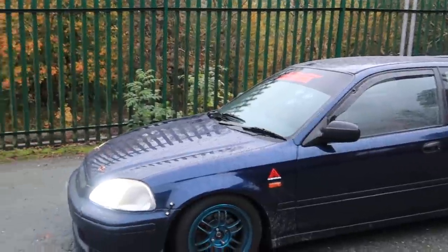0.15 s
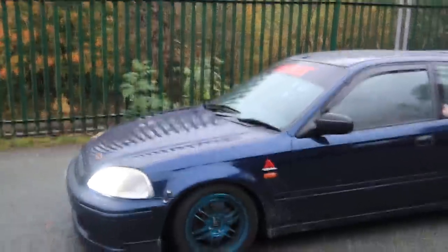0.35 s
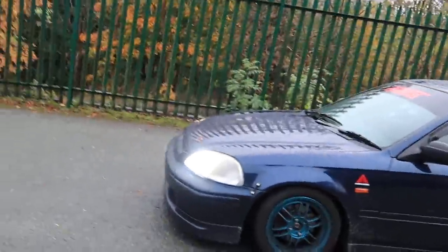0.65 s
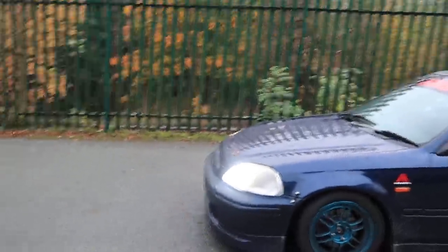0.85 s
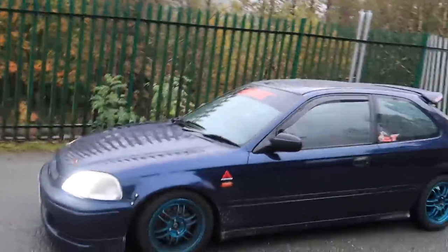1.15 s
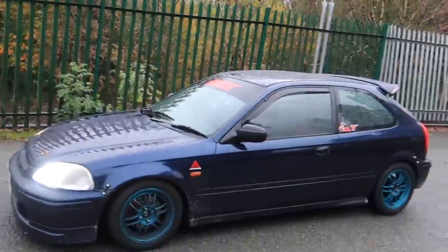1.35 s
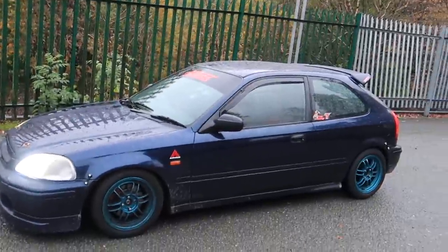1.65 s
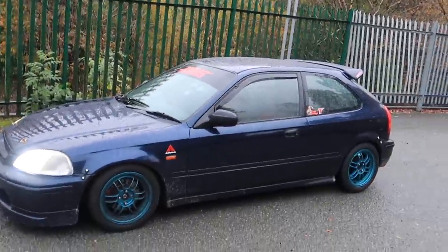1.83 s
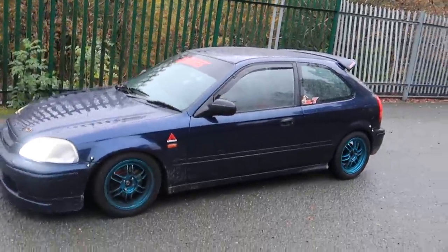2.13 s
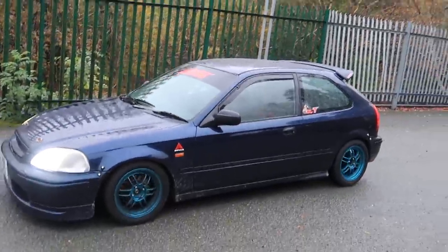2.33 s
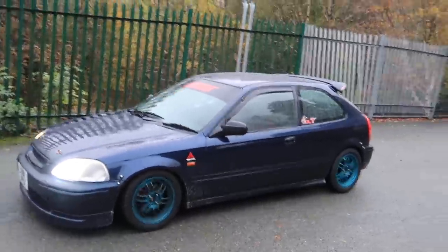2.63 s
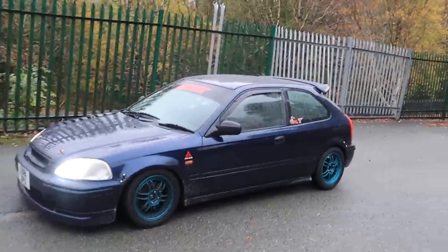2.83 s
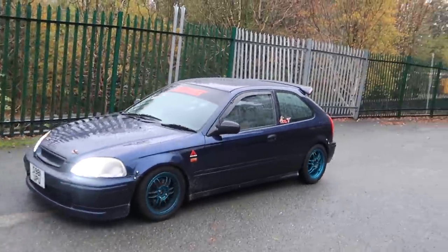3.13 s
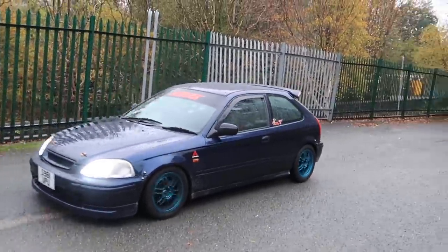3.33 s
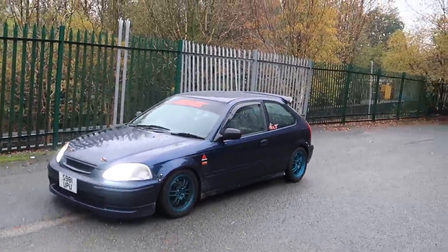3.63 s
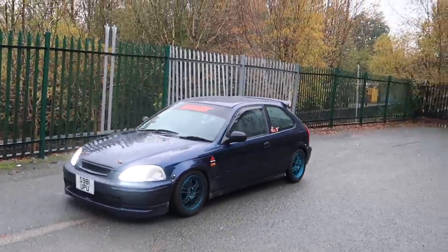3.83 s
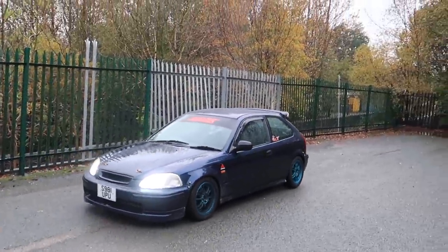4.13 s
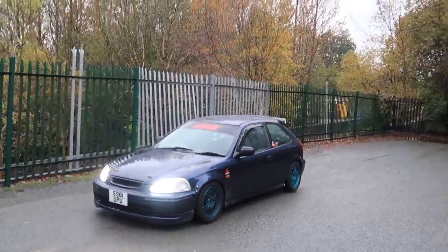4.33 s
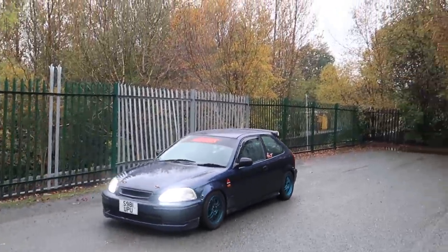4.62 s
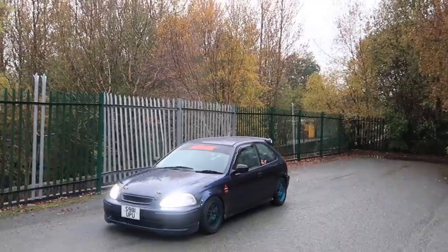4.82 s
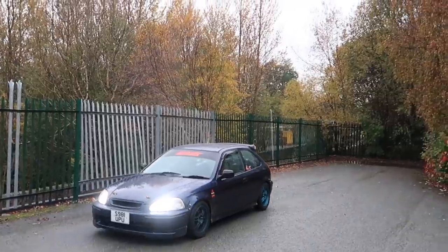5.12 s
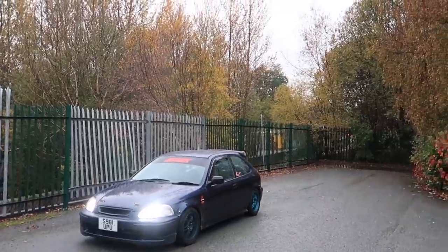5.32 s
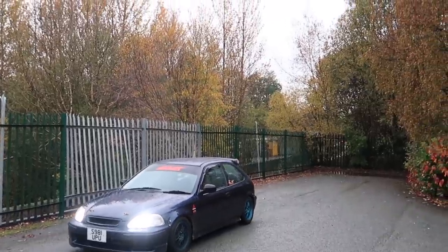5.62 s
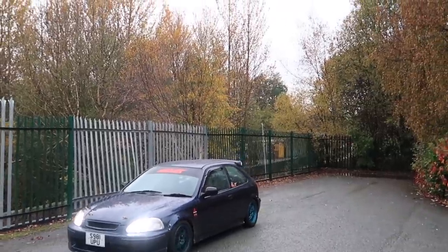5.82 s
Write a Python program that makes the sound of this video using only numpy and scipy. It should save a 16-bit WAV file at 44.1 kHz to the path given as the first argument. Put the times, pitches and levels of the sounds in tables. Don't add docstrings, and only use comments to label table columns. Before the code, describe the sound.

Boomy uneven car idle close by, a metallic clank, throttle blips with burbling lift-offs, then a fast climb to a loud buzzing exhaust howl.

```python
import sys
import numpy as np
from scipy import signal
from scipy.io import wavfile
from scipy.ndimage import uniform_filter1d

SR = 44100
rng = np.random.default_rng(int(sys.argv[2]) if len(sys.argv) > 2 else 0)


def inscribe(sig):
    pcm = np.round(np.clip(np.atleast_2d(sig).T, -1, 1) * 32767)
    wavfile.write(sys.argv[1], SR, pcm.astype(np.int16))


def volts(x):
    e = np.asarray(x, float) / 20
    return 10 ** e


N = 263277
RUN_IN = 4096


def rms_one(x):
    return x / np.sqrt(np.mean(x ** 2) + 1e-20)


def in_time(rows):
    s, *columns = np.transpose(rows)
    return [np.interp(np.arange(N) / SR, s, c) for c in columns]


def at_hz(points, hz):
    point_hz, value = np.transpose(points)
    return np.interp(np.log(hz), np.log(point_hz), value)


def band(x, low_hz, high_hz, order=2):
    edges_hz = [low_hz, min(high_hz, .45 * SR)]
    return signal.sosfilt(signal.butter(order, edges_hz, "band", fs=SR, output="sos"), x)


def resonance(x, hz, width_hz):
    r = np.exp(-np.pi * width_hz / SR)
    zeros = np.array([1, 0, -1]) * (1 - r * r) / 2
    poles = [1, -2 * r * np.cos(2 * np.pi * hz / SR), r * r]
    return signal.lfilter(zeros, poles, x + 1e-18)


def drift(rate_hz):
    knots = rng.standard_normal(400)
    return np.interp(np.arange(N) / SR * rate_hz * 2, np.arange(400), knots)


def dull(x):
    knee_hz, top_db = 3940, -20
    low = signal.sosfilt(signal.butter(6, knee_hz, fs=SR, output="sos"), x)
    return low + volts(top_db) * band(x, knee_hz, 9900)


def place(out, body, s, peak_db):
    at = round(s * SR)
    out[at:at + len(body)] += volts(peak_db) * body / np.abs(body).max()


def echo(x):
    # time in seconds, lag in ms, gain.
    bounce = [(0, .98, .08), (1.8, .98, .12), (2.4, 1.0, .33), (3.1, .97, .36), (3.6, .99, .28),
              (4.2, .95, .22), (4.9, .97, .45), (5.97, .95, .5)]
    at = np.arange(N)
    lag_ms, gain = in_time(bounce)
    return x + gain * np.interp(at - lag_ms * SR / 1000, at, x, left=0)


def clatter(turns, patchy_db=1.1, throb=0.08):
    # time in seconds, level in dB.
    level = [(0.0, -39.5), (0.21, -40.5), (0.33, -37.5), (0.444, -38), (0.65, -39), (0.95, -37),
             (1.25, -39), (1.45, -37), (1.62, -44.5), (2.17, -41.5), (2.5, -42.5), (3.05, -40), (3.5, -42),
             (3.95, -39), (4.12, -38.5), (4.25, -39.5), (4.42, -38), (4.53, -37.5), (4.57, -42.5),
             (4.7, -40.5), (5.05, -35.5), (5.278, -29.5), (5.522, -32.5), (5.764, -31), (5.97, -24)]
    # frequency in Hz, density in dB per Hz.
    colour = [(280, 6), (420, -4.5), (600, -7), (800, -8), (1150, -8), (1700, -12), (2100, -15.5),
              (3200, -20), (4300, -25), (5500, -32), (8000, -39), (11000, -41.5), (13000, -55.5),
              (15000, -81.5)]
    # frequency in Hz, side minus mid in dB.
    width = [(300, -30), (1000, -31), (2200, -20), (4000, -7.5), (6000, 1), (9000, 3.5), (13000, 6)]
    # time in seconds, extra treble in dB.
    rolling = [(1.5, 0.5), (1.7, -2), (2.6, -0.5), (3.2, 0), (3.85, -0.5), (4.1, 3.5), (4.25, -0.5),
               (4.4, 3.5), (4.53, 1.5), (4.6, 0.5), (5.3, 3), (5.97, 0.6)]
    # centre in Hz, width in Hz, share (negative cuts).
    humps = [(1440, 300, 0.56), (1747, 190, -0.6), (995, 160, -0.4)]
    mid_db, = in_time(level)
    treble_db = -52.5 + 0.8 * (mid_db + 40) + in_time(rolling)[0]
    white = rng.standard_normal((2, 2, N))
    white[:, 0] = [echo(w) for w in white[:, 0]]
    white[:, 0] += sum(share * resonance(white[:, 0], hz, width_hz) for hz, width_hz, share in humps)
    white[:, 0] *= 1 + throb * np.cos(2 * np.pi * turns)
    edges_hz = 270 * 2 ** np.arange(0, 6.1, .4)
    together = drift(6)
    parts = np.zeros((2, 2, N))
    for k, (low_hz, high_hz) in enumerate(zip(edges_hz, edges_hz[1:])):
        hz = np.sqrt(low_hz * high_hz)
        band_db = at_hz(colour, hz) + patchy_db * (together + drift(23))
        mid, side = band(white[k % 2], low_hz, high_hz) * volts(band_db)
        side = side * volts(at_hz(width, hz))
        parts[int(hz > 2500)] += [mid + side, mid - side]
    return volts(mid_db) * rms_one(parts[0]) + volts(treble_db) * rms_one(parts[1])


def rattles(clicks_per_s=7300.0):
    # start in seconds, peak in dB, centre in Hz, length in seconds.
    bursts = [(0.247, -49, 3800, 0.014), (0.255, -39.5, 4400, 0.032), (0.321, -36, 1150, 0.019),
              (0.471, -35.5, 4030, 0.045), (2.042, -35.5, 6980, 0.01), (3.708, -34.5, 6760, 0.036),
              (4.472, -36, 7350, 0.068), (1.119, -32.5, 4600, 0.054), (3.704, -35, 2200, 0.023),
              (3.705, -31.5, 3830, 0.015), (3.223, -39, 2000, .08), (4.45, -40, 3560, 0.061)]
    out, t = np.zeros(N), np.arange(6000) / SR
    for s, db, hz, length_s in bursts:
        draw = rng.random((2, len(t)))
        clicks = (draw[0] < clicks_per_s / SR) * (draw[1] - .5)
        clicks *= np.exp(-(t / length_s) ** 3) + .3 * np.exp(-t / .028)
        body = resonance(clicks, hz, 0.87 * hz)
        body += .5 * resonance(clicks, 1300, 280) + 0.1 * resonance(clicks, 2700, 300)
        body += .3 * resonance(clicks, 3600, 1000)
        place(out, dull(band(body, 750, 12000)), s, db)
    return out


def snaps():
    # start in seconds, peak in dB, ring in Hz, t60 in
    # seconds, crack share.
    sharp_clicks = [(.352, -31, 514, 0.014, .02), (0.369, -26.5, 680, 0.01, 0.12), (.461, -24, 940, 0.0094, 0.31),
                    (1.026, -11, 570, 0.0036, 0.93), (2.035, -34, 3000, 0.01, .2),
                    (2.0446, -11.5, 1150, 0.0093, 0.5), (2.066, -28, 1390, 0.0063, .1),
                    (2.083, -29.5, 810, 0.036, .03), (2.12, -31, 1254, .015, 0.046), (4.632, -25, 900, 0.0057, 0.4),
                    (4.647, -26, 820, .008, .3), (4.662, -26, 1200, .006, .4), (4.717, -21, 900, 0.0055, 0.4)]
    tail_per_s = 21.0
    out, t = np.zeros(N), np.arange(5000) / SR
    for s, db, hz, t60_s, crack in sharp_clicks:
        click = 1. * (t == 0)
        tail = rng.standard_normal(len(t)) * (t > .006) * np.exp(-t / .021)
        tail *= tail_per_s * t60_s * .2
        body = resonance(resonance(click + tail, hz, 2.0 / t60_s), hz, 1200)
        edge = resonance(click + 0.19 * tail, 1600, 2000)
        place(out, dull(body / np.abs(body).max() + crack * edge / edge.max()), s, db)
    return out


def clanks(clicks_per_s=5000.0, tail=.3, tail_s=.028):
    # start in seconds, peak in dB, length in seconds, brightness in dB per octave.
    knocks = [
        (.7535, -19.5, .012, 1.5),
        (.8025, -31, .005, 5.0),
        (.769, -30, .018, 3.0),
        (.8078, -13, .012, .6),
        (.817, -12, .011, 1.2),
        (.827, -13.5, .012, 1.5),
        (.841, -24, .022, 3.0),
    ]
    # frequency in Hz, level in dB, t60 in seconds.
    linkage = [(840, -9, .045), (1125, 0, .045), (1300, -7, .02), (1448, -4, .035), (1750, -10, .015),
               (2089, -7, .03), (2584, -11, .022), (2955, -11, .015), (3499, -10, .015), (3774, -10, .022),
               (4400, -12, .012), (4651, -15, .02), (6500, -12, .005)]
    out, t = np.zeros(N), np.arange(8000) / SR
    for s, db, length_s, tilt_db in knocks:
        draw = rng.random((2, len(t)))
        clicks = (draw[0] < clicks_per_s / SR) * (draw[1] - .5)
        clicks *= np.exp(-(t / length_s) ** 4) + tail * np.exp(-t / tail_s)
        body = np.zeros(len(t))
        for hz, level_db, t60_s in linkage:
            mode_db = level_db + tilt_db * np.log2(hz / 1125)
            body += volts(mode_db) * np.sqrt(t60_s) * resonance(clicks, hz, 2.2 / t60_s)
        place(out, band(dull(body), 740, 13000), s, db)
    return out


def firings(per_s, idle_scatter_db=1.5, late_s=.0002, jitter_s=.00002):
    cylinder_db = [0, -1.7, .15, -1.5]
    # start in seconds, length in seconds, scatter in dB.
    burbles = [
        (3.17, .17, 4.5),
        (3.77, .12, 2),
        (4.2, .2, 2),
    ]
    even_above_per_s = 90.0
    turns = np.cumsum(per_s) / SR + .49
    count = np.arange(1, int(turns[-1]))
    at = np.interp(count, turns, np.arange(len(per_s)))
    chance = rng.standard_normal((700, 2))[count]
    uneven = np.minimum(even_above_per_s / per_s[at.astype(int)], 1) ** 2
    delay_s = late_s * (count % 2) * uneven + jitter_s * chance[:, 0]
    at = np.clip(at + SR * delay_s, 0, len(per_s) - 2)
    scatter_db = .25 + idle_scatter_db * (27 / per_s[at.astype(int)]) ** 2
    for s, length_s, db in burbles:
        off_centre_s = np.abs((at - RUN_IN) / SR - s - length_s / 2)
        scatter_db += db * np.clip(1.5 - off_centre_s * 3 / length_s, 0, 1)
    size = volts(np.array(cylinder_db)[count % 4] + scatter_db * chance[:, 1])
    pulses = np.zeros(len(per_s))
    np.add.at(pulses, at.astype(int), size * (1 - at % 1))
    np.add.at(pulses, at.astype(int) + 1, size * (at % 1))
    return pulses, turns


def buzz(turns, scatter_db=2.5, sharp=1.0):
    start_s, swell_s, level_db, top_db = 5.73, .15, -31.5, -8
    hz, width_hz = 1330, 350
    strength = volts(scatter_db * rng.standard_normal(700))[turns.astype(int)]
    puffs = echo(rng.standard_normal(N) * np.exp(-sharp * np.cos(2 * np.pi * turns)) * strength)
    swell = np.clip((np.arange(N) / SR - start_s) / swell_s, 0, 1)
    low = rms_one(resonance(resonance(puffs, hz, width_hz), hz, 2 * width_hz))
    top = rms_one(band(puffs, 1900, 3600))
    return volts(level_db) * swell * (low + volts(top_db) * top)


def howling(per_s):
    from_per_s, full_per_s = 132, 158
    return np.clip((per_s - from_per_s) / (full_per_s - from_per_s), 0, 1)


def howl(turns, per_s, wobble_db=1.5):
    # multiple of the firing rate, level in dB, share of the push, share of the bark.
    orders = [(1.5, -31, 0.31, 0), (2, -30, 0.08, 0.93), (2.5, -38.5, 0.2, 0), (3, -40.5, 1.06, 0.087),
              (3.5, -49, .3, 0.021), (4, -38, .4, 0), (4.5, -40.5, .2, 0), (5, -41.5, 1.08, 0),
              (5.5, -50.5, .4, 0.14), (6, -47, 0.52, 0.098), (6.5, -48.5, .5, 0.022), (7, -48, 0.71, 0),
              (8, -47.5, 0.33, 0)]
    # time in seconds, push in dB, bark of the second order in dB.
    effort = [(5.02, 3, 4), (5.11, 8.5, 5.5), (5.2, 11, 2.5), (5.26, 12, 7), (5.32, 14.5, -1.5),
              (5.44, 12, 1.5), (5.51, 0, 0.5), (5.6, 0, -4.5), (5.7, 4.5, 2), (5.76, -0.5, 4.5),
              (5.82, 6, 8), (5.9, 6, 2.5), (5.97, 8, 6.5)]
    push_db, bark_db = in_time(effort)
    tones = np.zeros(N)
    for k, db, push, bark in orders:
        tone_db = db + push * push_db + bark * bark_db + wobble_db * drift(13)
        tones += volts(tone_db) * np.sin(2 * np.pi * k * turns)
    return howling(per_s) * tones


def lifted():
    # start in seconds, strength, sharpness and rasp lost in dB (negative is gained), time until it
    # starts to come back in seconds.
    lifts = [
        (3.128, 9.5, 12.5, 6, 0.15),
        (3.62, 0, 1, -1, 0.13),
        (4.36, 2.5, 13.5, 7, 0.046),
        (5.491, 2.5, -5.5, 5.5, 0.31),
        (4, -4.5, 2, 3, 0.13),
        (5.05, 7, 1.5, -1.5, .07),
        (4.93, 2.5, -3, 0.5, 0.26),
        (5.105, -3, -2, -2, 0.046),
        (5.76, -0.6, -2.5, 2, .4),
    ]
    edge_s = .03
    t = np.arange(N) / SR
    shut = []
    for s, *_, back_s in lifts:
        closing = np.clip((t - s) / edge_s, 0, 1)
        reopening = np.clip((s + back_s - t) / (.6 * back_s) + 1, 0, 1)
        shut.append(closing * reopening)
    return np.array(lifts)[:, 1:4].T @ shut


def exhaust(pulses, per_s):
    # (centre in Hz, width in Hz, level in dB).
    pipe = [(35.5, 115, [(65.95, 11.4, -13.5), (95.44, 14, -16)]), (92.4, 170, [(122.45, 30.9, -15),
            (135.52, 9.2, -8.5), (151.03, 13.1, -11.5)]), (183.6, 322.5, [(189.3, 30, -29.5),
            (231.6, 21, -30), (249.6, 21.8, -28.5), (274, 16, -39)]), (330, 5800, [(344.3, 63, -39),
            (408, 36.3, -40.5), (469, 40, -45), (558, 18, -46.5), (742, 120, -40), (1190, 330, -57.5)])]
    gas_db = [-25, -34, -12, -4.5]
    ring_up_s = [0.04534, 0.02396, 0.01403, 0.005054]
    shares = [(0.98, -0.49, 0.36), (0.92, -0.042, 0.16), (0.21, 0.97, 0.0056), (0.2, 0.19, 1)]
    # time in seconds, strength, sharpness and rasp in dB, gas warmth in % of sound speed.
    throttle = [(0.0, -9.5, -3, -17, -3), (1.0, -11, -3, -10.5, 0), (1.311, -14, -11.5, -15, -1),
                (1.436, -2.5, -1, -13, 1), (1.55, -3, 0, -7.5, 0.4), (1.65, -0.7, -0.5, -5.5, 1.5),
                (1.752, -1.5, 0, -2, 0.6), (2.05, .5, 0, -3.2, -2), (2.323, 1.5, 0.2, 0, -4.5),
                (2.45, 0.1, 0, -2.5, 2), (2.58, 3.8, -2, -0.8, 9), (2.64, 1, 1, 0, 13),
                (2.696, -0.5, 3, 3, 15), (2.75, -2.5, 5, 8, 5), (2.796, -4.5, 11.5, 11, -3.5),
                (2.93, -2.5, 12, 8.5, -0.1), (3.083, 0, 10, 4, 6), (3.3, -4, 11, 0.5, 2),
                (3.45, -6.5, 8, -2, 0.9), (3.577, -5.5, 7.5, -2, -2.5), (3.68, -10, 0.5, -6.5, -5.5),
                (3.778, -12.5, -4, -3, -6), (3.9, -6, 1.4, -8.5, -3), (4.036, -0.5, 4, -12.5, 1),
                (4.15, -3, 3.5, -17, -1.7), (4.27, -7.5, -1.8, -21.5, -2.5), (4.392, -7.5, 0.5, -26, -3),
                (4.44, -3.5, 2, -20, -3.5), (4.492, 2.5, 4.5, -12.5, -5), (4.55, 3, 4.5, -8.5, -1.5),
                (4.62, 1, 4, -3.5, 2), (4.741, 1, 12, 4, 8), (4.87, 3.5, 7.5, 4.5, 4),
                (5.011, 4, 7.5, 10.5, 1), (5.209, 4, 15, 22.5, 13), (5.6, 4, 8.5, 17.5, 15),
                (5.97, 1.5, 1, 14.5, 15)]
    # time in seconds, extra level in dB.
    boom = [(0, 1), (1.4, -2), (1.62, 0.5), (1.75, -3), (1.9, -8), (2.1, -5), (2.3, 1), (2.6, -2.5),
            (2.9, -.5), (3.15, 1.5), (3.3, 0), (3.5, 4), (3.7, 5.5), (3.83, 3), (3.95, 1), (4.15, 3.5),
            (4.4, 4), (4.65, 1.5), (4.73, -6), (4.79, 0), (4.87, -2), (5.0, -2), (5.2, 0), (5.48, -6.5),
            (5.58, 7.5), (5.78, -0.5), (5.86, -9.5)]
    *load_db, warm = in_time(throttle)
    load_db = np.pad(load_db - lifted(), ((0, 0), (RUN_IN, RUN_IN)), "edge")
    per_s, warm, boom_db = (np.pad(c, RUN_IN, "edge") for c in (per_s, warm, in_time(boom)[0]))
    sharp_db, rasp_db = load_db[1], load_db[2]
    at = np.arange(len(per_s))
    howl_share = howling(per_s)

    rise = np.clip(np.gradient(np.log2(per_s)) * SR, 0, 3)
    surge_db = np.maximum(4 - 6 * np.log2(per_s / 27), -8) + 2.5 * rise * (per_s > 60)
    gas = rng.standard_normal(len(at)) * np.sqrt(per_s / SR) * volts(surge_db)

    wide_open_s = 4.6
    shut = np.clip((wide_open_s - (at - RUN_IN) / SR) / .07 + 1, 0, 1)
    open_db = (-25 + 0.23 * rasp_db) * shut - 0.2 * rasp_db * (1 - shut)

    rumble = rms_one(band(pulses + .3 * gas, 30, 50)) * 1.7
    out = volts(-47.5 + 2 * boom_db) * (27 / per_s) ** .8 * rumble

    jet_from_per_s, jet_full_per_s = 68, 200
    through = np.clip((per_s - jet_from_per_s) / (jet_full_per_s - jet_from_per_s), 0, 1)
    jet = band(pulses * SR / per_s, 244, 364)
    out += volts(-28.5 + 0.53 * sharp_db) * through * (1 - howl_share) * jet

    pipe_time = np.cumsum(1 + uniform_filter1d(warm, size=2000) / 100)
    real_time = np.interp(np.arange(int(pipe_time[-1])), pipe_time, at)
    opening_db = np.interp(real_time, at, open_db)
    for k, (low_hz, high_hz, modes) in enumerate(pipe):
        upper = (k > 1) * howl_share
        clearing = (27 / per_s) ** (.6 * (high_hz < 200))
        drive = pulses * (1 - upper) + volts(gas_db[k] - 5 * upper) * gas * clearing
        flow = np.cumsum(drive * SR / per_s / np.sqrt(2))
        drive = np.gradient(np.interp(real_time + ring_up_s[k] * SR, at, flow))
        rung = np.zeros(len(drive))
        for j, (hz, width_hz, db) in enumerate(modes):
            mode_db = db + opening_db * np.clip((hz - 400) / 300, 0, 1)
            mode = resonance(resonance(drive, hz, width_hz), hz, 1.82 * width_hz)
            rung += volts(mode_db) * (-1) ** j * mode
        rung = np.interp(pipe_time, np.arange(len(drive)), band(rung, low_hz, high_hz, order=3))
        if k == 0:
            rung *= volts(3 * np.log2(np.maximum(per_s / high_hz, 1)) + boom_db)
        section_db = shares[k] @ load_db
        if k == 3:
            section_db = section_db - 0.33 * rasp_db * (1 - shut)
        out += volts(uniform_filter1d(section_db, size=900)) * rung
    return out[RUN_IN:-RUN_IN]


def scene():
    # time in seconds, firings per second.
    idle = [(0, 26.0), (.5, 26.4), (.75, 27.2), (1.04, 27.6), (1.35, 27.4)]
    # time in seconds, firings per second.
    revs = [(1.486, 30.8), (1.746, 45.9), (1.897, 49.3), (2.334, 44.4), (2.662, 64.7), (2.951, 76.7),
            (3.156, 80.7), (3.274, 73.8), (3.701, 61.2), (4.346, 33.7), (4.425, 33.6), (4.51, 44),
            (4.6, 59.5), (4.72, 80.5), (4.82, 103.5), (4.95, 128.3), (5.183, 162.6), (5.438, 163.9),
            (5.601, 179.7), (5.823, 164.9), (5.97, 167.7)]
    port_lag = .35
    per_s = uniform_filter1d(in_time(idle + revs)[0], size=3100)
    pulses, turns = firings(np.pad(per_s, RUN_IN, "edge"))
    turns = turns[RUN_IN:-RUN_IN]
    noise = clatter(turns)
    car = rattles() + snaps() + clanks() + buzz(turns) + howl(turns, per_s) + exhaust(-pulses, per_s)
    between_ports = port_lag * band(np.gradient(car), 110, 16000, order=1)
    return car + between_ports * [[1], [-1]] + noise


def top_cut(x):
    return signal.sosfilt(signal.butter(12, 15100, fs=SR, output="sos"), x)


def record(dry):
    mix = 1.258 * np.tanh(dry / 1.08)
    return top_cut(mix)


dry = scene()
out = record(dry)
inscribe(out)
```